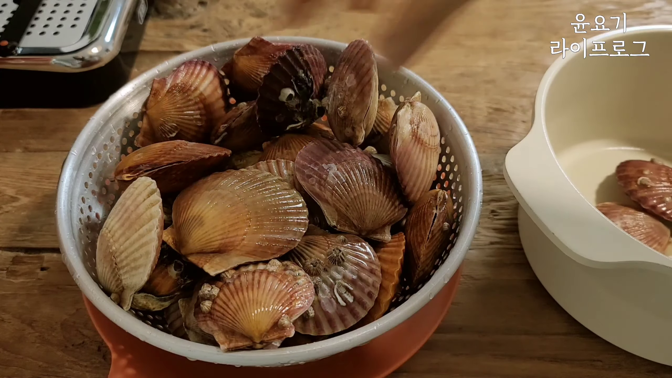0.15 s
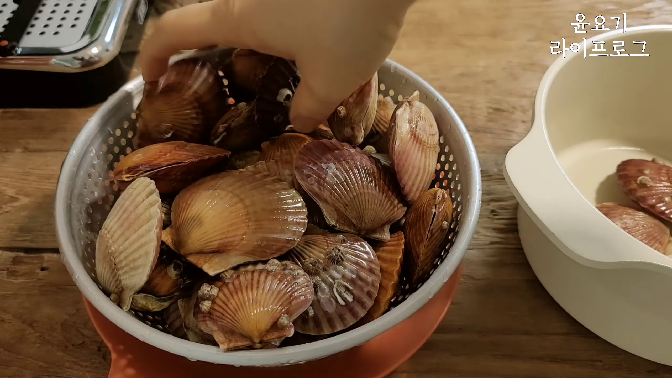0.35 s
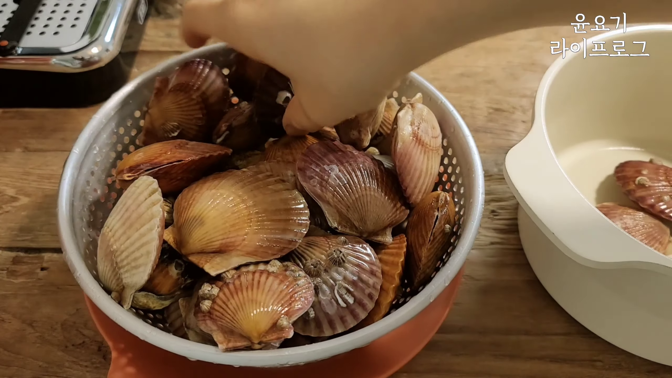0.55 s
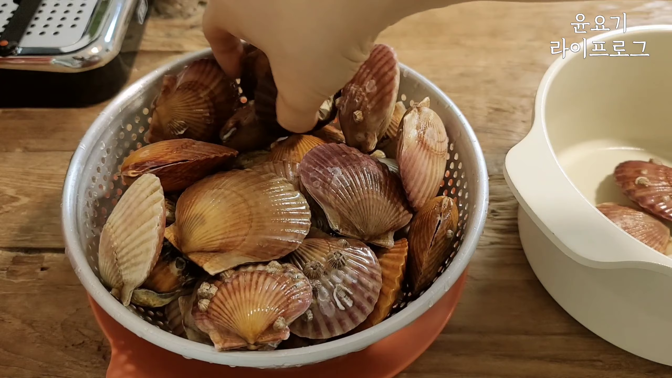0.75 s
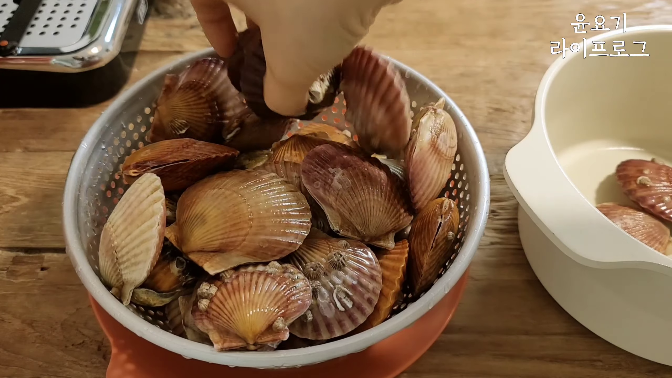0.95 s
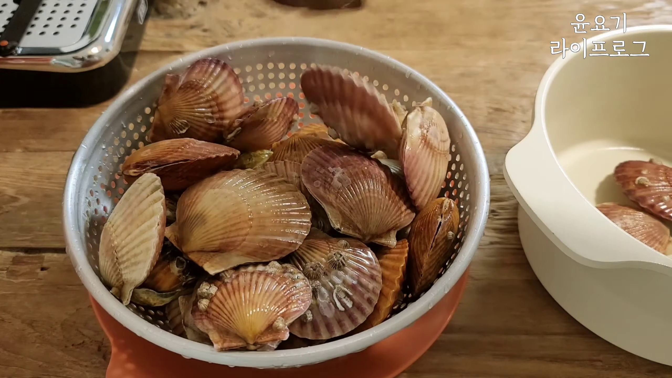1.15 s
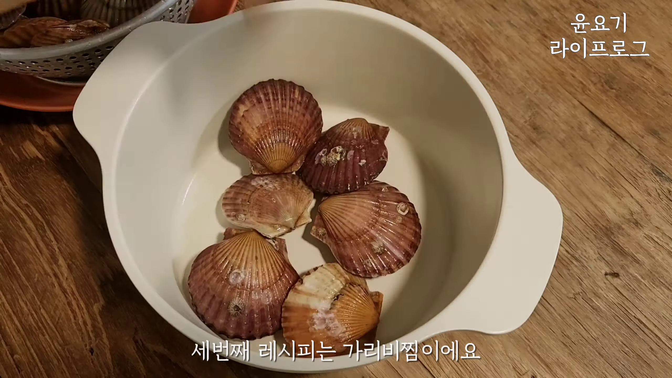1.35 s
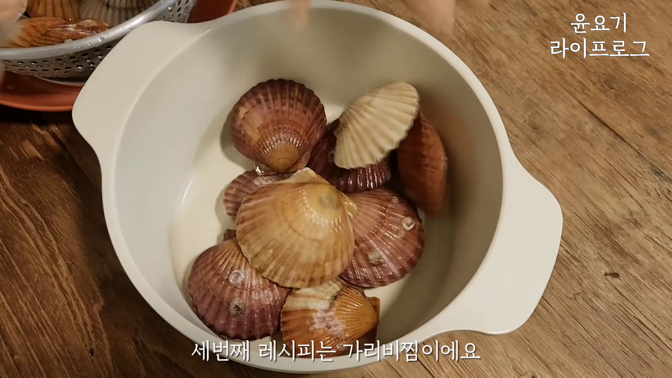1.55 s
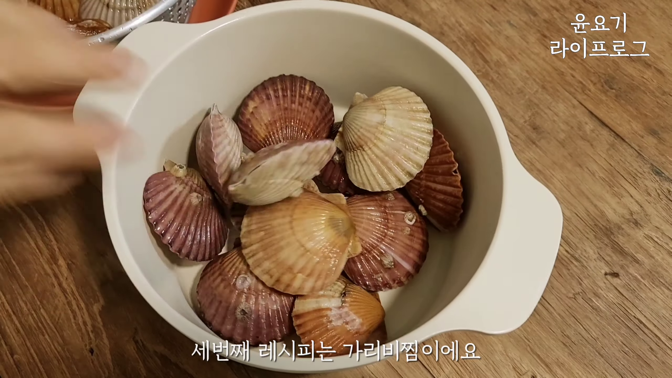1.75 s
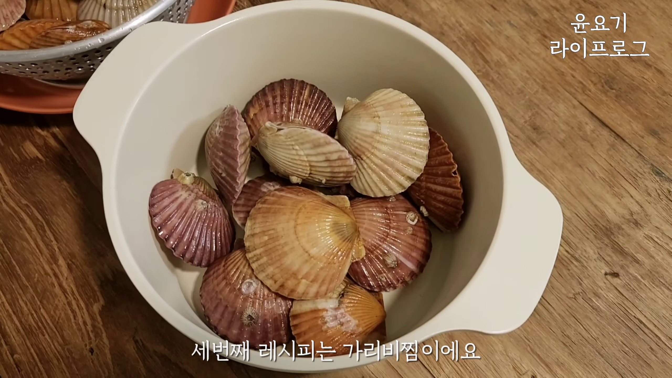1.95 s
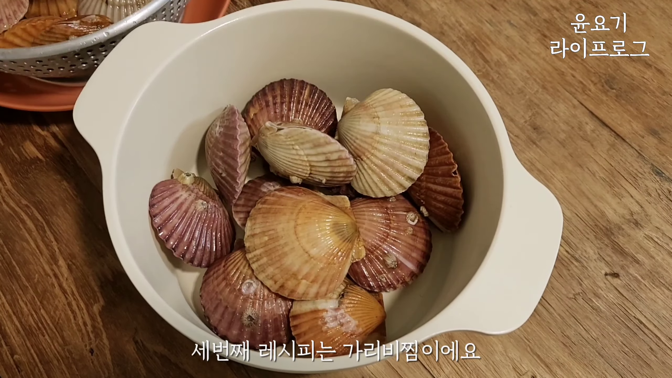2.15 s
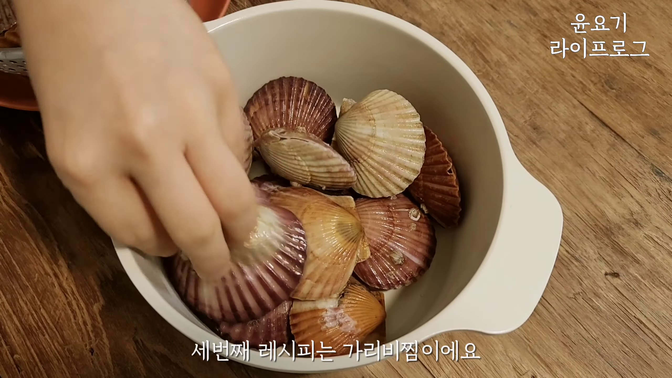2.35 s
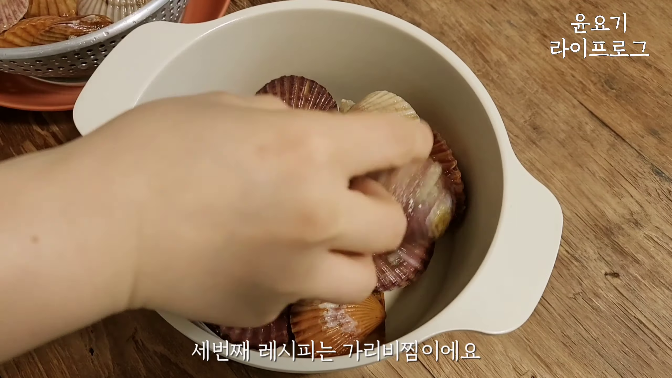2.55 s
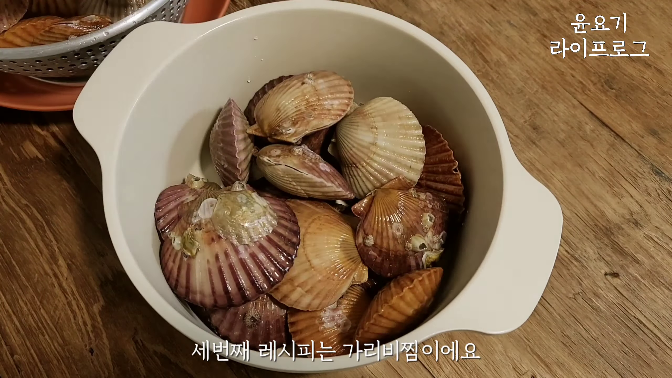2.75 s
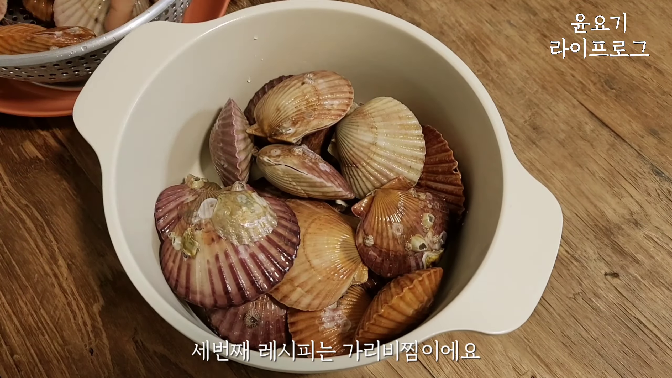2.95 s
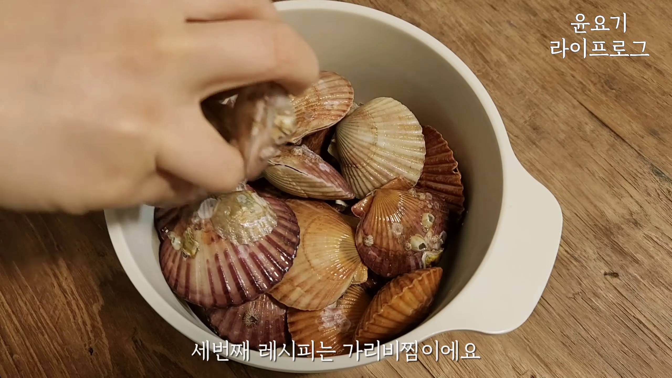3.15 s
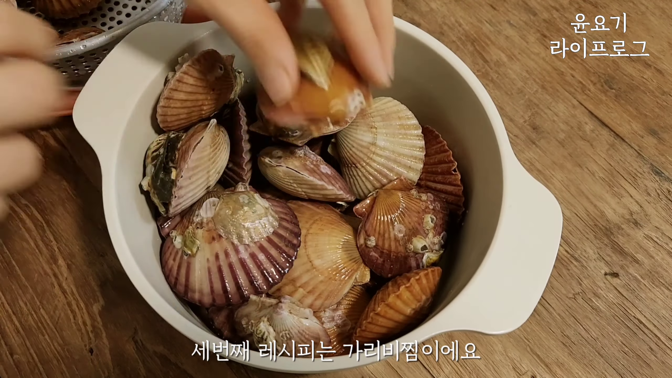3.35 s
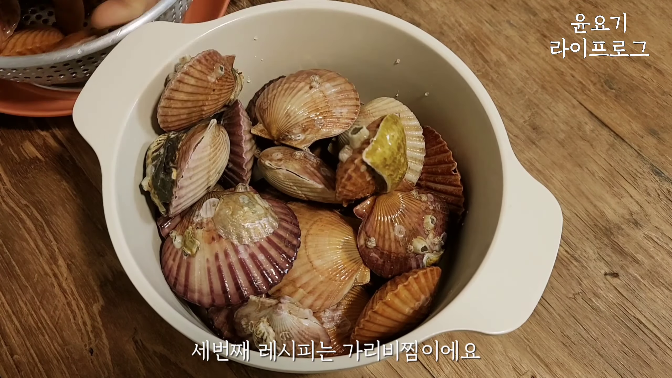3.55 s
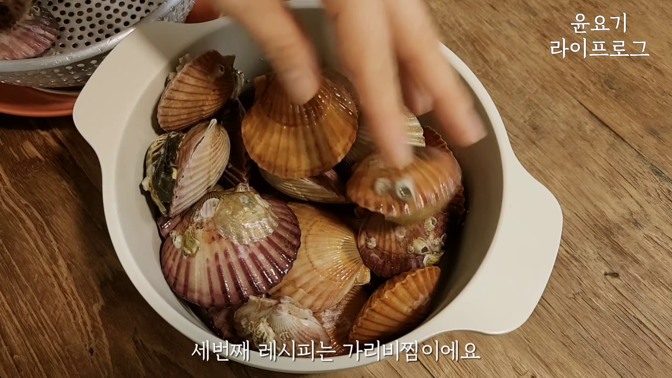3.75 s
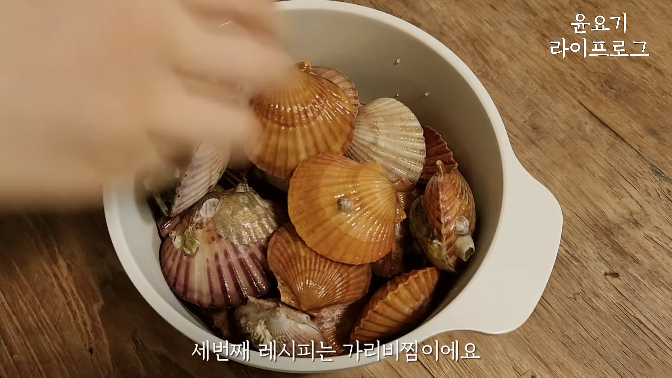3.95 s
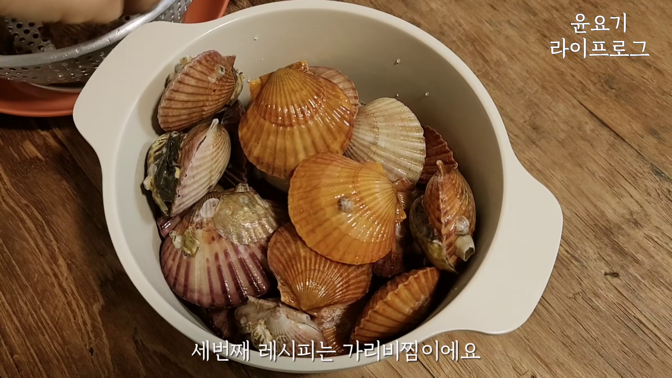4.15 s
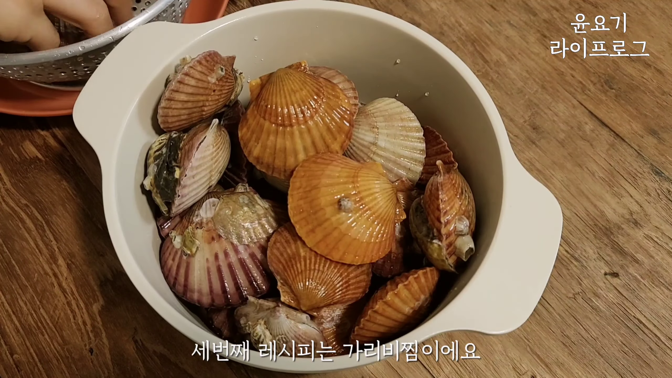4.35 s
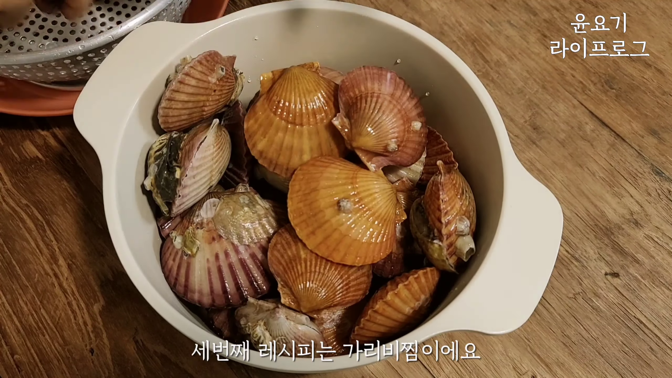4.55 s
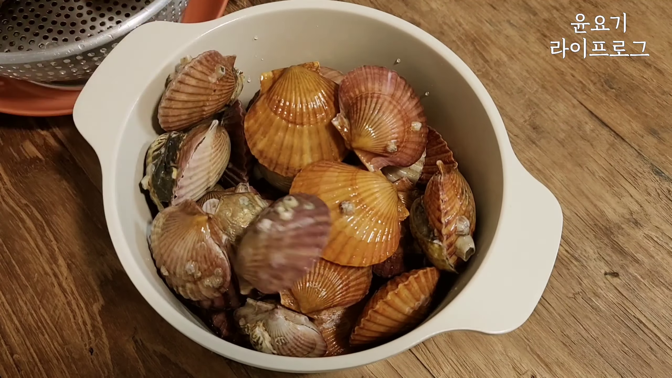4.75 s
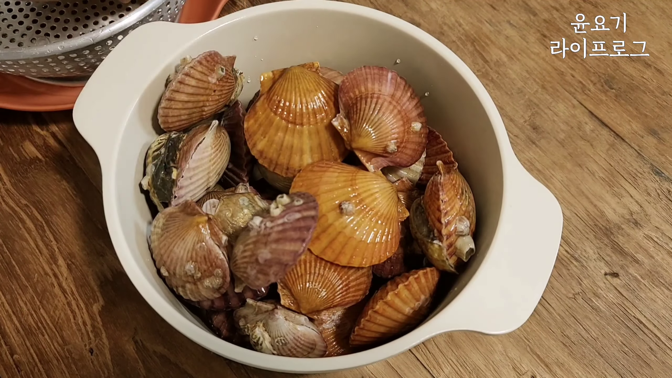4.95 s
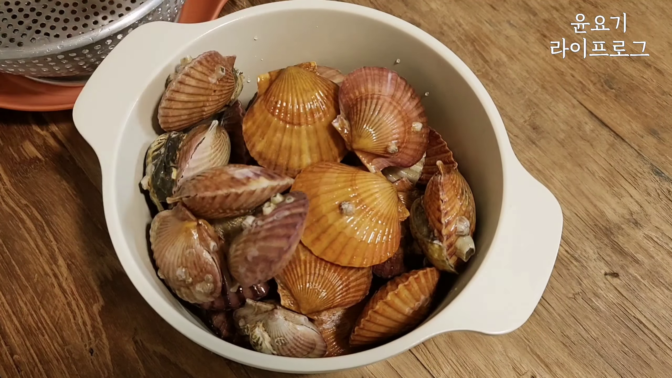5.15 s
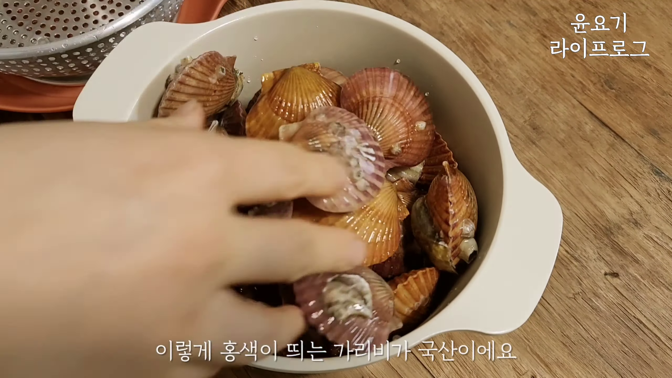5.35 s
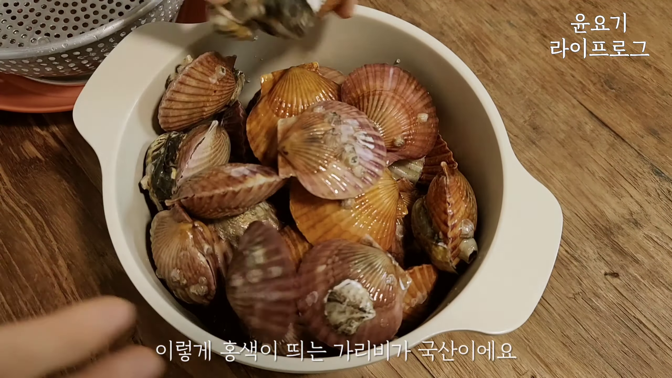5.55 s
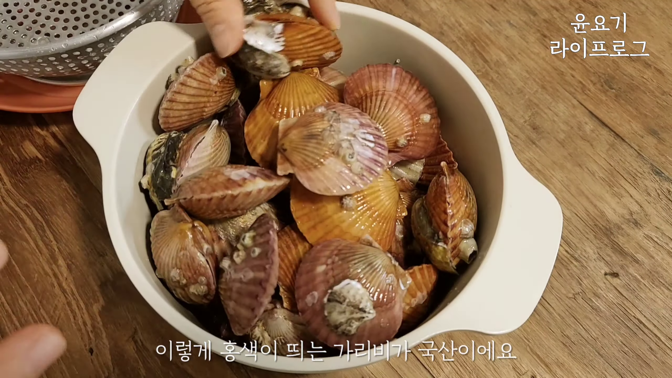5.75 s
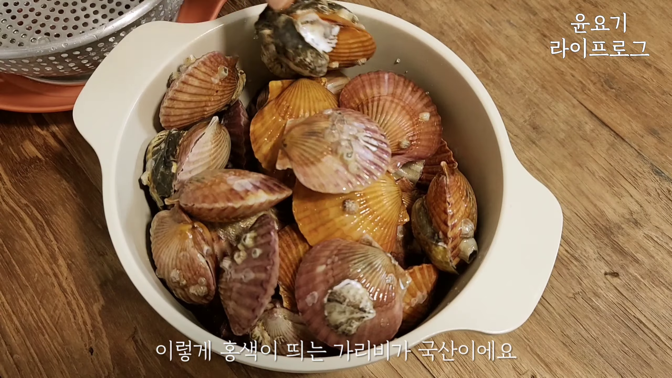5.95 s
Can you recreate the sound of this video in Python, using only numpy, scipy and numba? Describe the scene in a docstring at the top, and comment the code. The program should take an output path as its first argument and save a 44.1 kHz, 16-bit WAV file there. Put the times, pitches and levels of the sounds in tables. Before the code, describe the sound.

Hard ribbed shells grind and knock in a deep heap, then quick sharp clacks and scrapes ring a pot's wall, close up.

```python
"""In a small quiet kitchen a pot rings out, two close microphone ports hearing decaying sines, until a hand damps it.
Meanwhile a hand stirs wet scallop shells in a colander: clacks are bursts of many short modes, ribs grind in dense
small ticks, and low-passed noise rumbles in the table. Soft knocks of damped low modes come through the table top
from 0.35 to about 4 s. Then the shells clack and grind in the pot, shorter and higher in pitch as if sped up, and
its wall rings with them. Faint coloured noise lies under it all."""
import sys
import numpy as np
from scipy import signal
from scipy.fft import rfft, irfft
from scipy.io import wavfile
from scipy.ndimage import uniform_filter1d
from numba import njit

SR = 44100
rng = np.random.default_rng(int(sys.argv[2]) if len(sys.argv) > 2 else 0)


def int16_out(signal):
    """Quantize to a 16-bit WAV file."""
    q = np.round(np.clip(np.atleast_2d(signal).T, -1, 1) * 32767)
    wavfile.write(sys.argv[1], SR, q.astype(np.int16))


N = 268569

# blows of shell on shell, before wall and room: start_s, level_db, strongest_ring_hz
BLOWS = [(0.359, -15, 1260), (0.432, -15.5, 1640), (0.439, -15, 1620), (0.473, -17, 1210),
         (0.609, -18.5, 1700), (0.671, -20, 1660), (0.714, -22, 1450), (0.737, -9, 1540),
         (0.88, -16.5, 1530), (0.898, -17, 1150), (0.935, -16, 1340), (1.041, -15, 1550),
         (1.074, -21.5, 1120), (1.105, -5, 1530), (1.185, -4.5, 1565), (1.235, -7.5, 1500),
         (1.499, -19.5, 4650), (1.516, -7.5, 6180), (1.53, -17, 1340), (1.542, -9.5, 1350),
         (1.589, -5, 5130), (1.605, -16, 5030), (1.623, -14.5, 5370), (1.709, -23, 2620),
         (1.725, -8.5, 5000), (1.739, -7.5, 5200), (1.805, -20.5, 5500), (1.845, -19, 2700),
         (1.874, -14, 4700), (1.896, -17.5, 5060), (2.12, -14.5, 5860), (2.164, -19.5, 2450),
         (2.354, -16, 2530), (2.394, -11.5, 4700), (2.571, -23.5, 5033), (2.595, -9, 2644),
         (2.605, -4.5, 5040), (2.706, -11.5, 2480), (2.716, -6, 4870), (3.214, -15.5, 4604),
         (3.231, -7.5, 4450), (3.333, -10, 5600), (3.338, -18, 3980), (3.413, -10, 4630),
         (3.418, -11, 2593), (3.669, -22.5, 3190), (3.762, -9.5, 4610), (3.829, -16.5, 4760),
         (3.838, -15, 5270), (3.847, -17, 3222), (3.944, -17.5, 4917), (3.953, -11, 6100),
         (3.963, -9.5, 5430), (4.163, -13, 3070), (4.253, -51.5, 2834), (4.285, -23, 3150),
         (4.314, -18, 3209), (4.383, -20.5, 2780), (4.562, -17, 4520), (4.575, -11, 5050),
         (4.692, -9, 5897), (4.695, -8.5, 5700), (4.712, -18, 5060), (5.009, -19, 3013), (5.077, -10, 4580),
         (5.306, -26, 3275), (5.357, -7.5, 4193), (5.366, -9.5, 4616), (5.492, -20, 4900),
         (5.575, -24, 4920), (5.613, -31, 4766), (5.638, -15.5, 5200), (5.699, -9.5, 2340),
         (5.704, -20.5, 2070), (5.808, -17, 6107), (5.902, -27, 3810), (5.949, -18.5, 4930),
         (5.97, -21.5, 2572), (6.021, -25, 4493)]
# ribs dragged over ribs, typical tick level before wall and room: start_s, end_s, level_db
SLIDES = [(0, 0.057, -59), (0.234, 0.247, -45), (0.326, 0.607, -49), (0.662, 0.795, -43),
          (0.861, 0.95, -44), (1.002, 1.303, -53), (1.286, 1.398, -61), (1.498, 1.63, -45.5),
          (1.678, 1.726, -48.5), (1.727, 1.777, -42.5), (1.846, 1.911, -44.5), (1.97, 2.134, -48),
          (2.105, 2.242, -53), (2.351, 2.41, -45), (2.657, 2.77, -49), (2.801, 2.937, -54),
          (2.948, 3.029, -45.5), (3.16, 3.176, -60), (3.214, 3.256, -42), (3.332, 3.363, -46.5),
          (3.523, 3.761, -53), (3.786, 3.893, -51.5), (3.933, 3.985, -42.5), (4.063, 4.429, -47),
          (4.453, 4.539, -53.5), (4.589, 4.687, -60.5), (4.7, 4.736, -42.5), (4.775, 4.96, -53.5),
          (5.005, 5.044, -43.5), (5.077, 5.14, -45.5), (5.224, 5.34, -58.5), (5.381, 5.454, -62.5),
          (5.478, 5.533, -48), (5.631, 5.751, -51), (5.803, 5.862, -52), (5.89, 6.084, -48.5)]
HOLLOW_HZ = 1900  # blows that ring lower come from the deep heap in the colander
TO_POT_S = 1.45  # slides that start from here on are in the pot
RUMBLE_END_S = 1.58  # the colander is stirred until here
GRIP_DB_PER_S, LET_GO_DB_PER_S = 2488, 700  # how fast sliding starts and stops


def undb(db):
    """Level is logarithmic: 20 dB is a factor of ten in amplitude."""
    return 10 ** (np.asarray(db) / 20)


def colour(table, hz):
    """Spectral envelope: dB at the given frequencies, interpolated along log frequency."""
    table_hz, db = np.transpose(table)
    return np.interp(np.log(hz), np.log(table_hz), db)


@njit
def add(out, start, hz, t60, phase, left, right, lag, rise):
    """Modal superposition: exponentially decaying sines with a short rise, each with its own delay at the left."""
    for k in range(len(start)):
        # one complex factor per sample turns the phase and shrinks the amplitude
        step = np.exp((2j * np.pi * hz[k] - np.log(1000) / t60[k]) / SR)
        state = np.exp(1j * phase[k])
        gap = 1.
        first = int(start[k] * SR)
        for i in range(first, min(first + int(.7 * t60[k] * SR), out.shape[1] - 64)):
            gap *= rise
            value = state.imag * (1 - gap)
            out[0, i + lag[k]] += left[k] * value
            out[1, i + 20] += right[k] * value
            state *= step


def modes(start, hz, db, t60, rise_s, leads=0):
    """Free vibration: single decaying tones, equally strong at both ports; leads is the left's, in samples."""
    out = np.zeros((2, N))
    size = undb(db)
    lag = np.full(len(start), 20 - leads)
    add(out, start, hz, t60, 0 * start, size, size, lag, np.exp(-1 / (rise_s * SR)))
    return out


def kitchen():
    """Filtered noise: faint room air, plus low table rumble, mostly common to both ports, while stirring."""
    # spectrum of the room noise, relative: frequency_hz, density_db
    air_colour = [(40, -22.5), (170, 5), (600, -12), (2500, -9), (15000, -24.5)]
    air_db, rumble_db, rumble_hz = -68.5, -63, 135
    f = np.fft.rfftfreq(N, 1 / SR) + 1
    air = irfft(rfft(rng.standard_normal((2, N))) * undb(colour(air_colour, f)), N)

    source = rng.standard_normal(N) + 0.19 * rng.standard_normal((2, N))
    low_pass = 1 / (1 + (f / rumble_hz) ** 2)
    high_pass = 1 / (1 + 60 / f)
    rumble = irfft(rfft(source) * low_pass * high_pass, N)
    stirred = np.clip((RUMBLE_END_S - np.arange(N) / SR) / 0.016, 0, 1)
    return air / air.std() * undb(air_db) + rumble / rumble.std() * undb(rumble_db) * stirred


def knocks():
    """Damped resonance: fingers and vessels thud on the table top, which answers with three low modes."""
    # thuds, level of the strongest mode before its slow rise: start_s, level_db
    thuds = [(0.354, -37), (1.099, -34), (1.178, -25.5), (1.652, -31.5), (1.7, -36), (1.748, -36.5),
             (1.806, -36), (1.865, -31), (1.916, -27.5), (2.083, -37), (2.13, -43), (2.173, -43),
             (2.245, -43), (2.324, -44.5), (2.427, -54), (2.539, -52), (2.791, -41.5), (2.93, -42.5),
             (3.181, -42.5), (3.313, -45), (3.561, -49.5), (3.698, -37.5), (3.92, -42)]
    start, db = np.transpose(thuds)
    centre_hz = np.where(start < RUMBLE_END_S, 103, 179.2)  # under the colander, under the pot
    detune = 1 + .04 * rng.standard_normal((len(start), 3))
    hz = centre_hz[:, None] * [.8, 1, 1.3] * detune
    mode_db = db[:, None] + [-8., 0., -7.]
    return modes(np.repeat(start, 3), hz.ravel(), mode_db.ravel(), np.full(hz.size, .07), rise_s=.009)


def pot_ringing():
    """Free decay, then added damping: the empty pot, struck just before, rings until a hand damps it."""
    # modes of the empty pot, level at the start: frequency_hz, level_db, t60_s
    pot_modes = [(1272, -33, 3.5), (1591, -38, 0.95), (3240, -62, 0.8)]
    damped_s, damping_db_per_s = 0.49, 90
    hz, db, t60 = np.transpose(pot_modes)
    free = modes(0 * hz, hz, db, t60, rise_s=.0001, leads=-8)
    return free * undb(-damping_db_per_s * np.maximum(np.arange(N) / SR - damped_s, 0))


def room(x, wet_db, t60):
    """Diffuse reflection: nearby surfaces return a short decaying noise tail, different at each port."""
    t = np.arange(SR // 2) / SR
    tail = rng.standard_normal((2, len(t))) * undb(-60 * t / t60) * (t > .002)
    tail = tail / np.sqrt(np.sum(tail ** 2, 1, keepdims=True))
    reflected = signal.fftconvolve(x.mean(0, keepdims=True), tail, axes=1)[:, :N]
    return x + undb(wet_db) * reflected


def pot_wall(x):
    """Forced resonance: all that strikes or rubs inside the pot also rings its wall, by convolution."""
    # wall modes, level in the impulse response: frequency_hz, level_db, t60_s
    wall_modes = [(316, -48, .12), (507, -45, .17), (660, -49, .1), (916, -45, .1), (1337, -52, .07),
                  (2137, -57, .2), (5790, -58, .15), (10290, -66, .13)]
    hz, db, t60 = np.transpose(wall_modes)
    response = modes(0 * hz, hz, db, t60, rise_s=.001)[:, :SR // 2]
    return signal.fftconvolve(x, response, axes=1)[:, :N]


def contacts(start, db, ring_hz, shell, leads, count, t60, focus_db, octaves, spread_db, rise_s):
    """Impact excitation: each contact rings a dense random mode set, favouring shell colour and strongest ring."""
    chance = rng.random((len(start), count, 4))
    place = rng.standard_normal((len(start), 2))
    u = (np.arange(count) + chance[..., 0]) / count
    hz = 250 + 16000 * u ** 2

    # high modes die much sooner; those near the strongest ring last longer
    near = np.exp(-(np.log2(hz / ring_hz[:, None]) / octaves) ** 2)
    fade = t60 * (hz / 2000) ** -.7 * (.5 + chance[..., 1])
    fade = fade * (1 + .8 * near)

    # u makes up for the sparser high modes, fade for the energy of longer ringing
    size = undb(colour(shell, hz) + focus_db * near) * np.sqrt(u / fade)
    size = size * undb(db)[:, None] / np.sqrt(np.sum(size ** 2, 1, keepdims=True))

    # each mode radiates its own way, so the ports get unlike shares of it
    pan_db = 1.7 + 3.6 * place[:, :1] + spread_db * (chance[..., 2] - .5)
    left, right = size * undb(pan_db / 2), size * undb(-pan_db / 2)
    mode_shift = .22 * (chance[..., 1] - .5) * SR / hz
    lag = np.clip(20 - leads + 2.5 * place[:, 1:] + mode_shift, 0, 60).astype(np.int64)

    out = np.zeros((2, N))
    rows = (start[:, None] + 0 * hz, hz, fade, 2 * np.pi * chance[..., 3], left, right, lag)
    add(out, *(row.ravel() for row in rows), np.exp(-1 / (rise_s * SR)))
    return out


def grind(slides, blows, shell, leads, slide_hz, settle_s, rate, rattle_db, rattle_t60, t60, focus_db):
    """Stick-slip: sliding ribs catch and let go, and struck shells rattle as they settle, in bunched ticks."""
    slide_start, slide_end, slide_db = np.transpose(slides)
    hit, hit_db, hit_hz = np.transpose(blows)
    last = max(slide_end[-1], hit[-1] + settle_s) + .1

    # random arrivals at `rate` ticks per second, of uneven strength
    chance = rng.random((int(2500 * (last - slide_start[0])), 3))
    start = slide_start[0] + np.cumsum(-np.log(chance[:, 0]) / rate)
    bunch_db = 60 * uniform_filter1d(chance[:, 2] - .5, size=20)
    luck_db = np.minimum(-4.3 * np.log(chance[:, 1]), 16.) + bunch_db
    keep = start < last
    start, luck_db = start[keep], luck_db[keep]

    # every tick against every slide and every blow
    s = start[:, None]
    onset_db = GRIP_DB_PER_S * np.maximum(slide_start - s, 0)
    release_db = LET_GO_DB_PER_S * np.maximum(s - slide_end, 0)
    slide = undb(slide_db - onset_db - release_db)
    since = np.abs(s - hit)
    settling_db = 60 * since / rattle_t60 + LET_GO_DB_PER_S * np.maximum(since - settle_s, 0)
    rattle = undb(hit_db + rattle_db - settling_db) * (s > hit)
    effort_db = 10 * np.log10(np.sum(slide ** 2, 1) + np.sum(rattle ** 2, 1) + 1e-12)

    # a shell just struck keeps the ring of its blow
    latest = np.maximum(np.searchsorted(hit, start) - 1, 0)
    ring_hz = np.where(np.abs(start - hit[latest]) < settle_s, hit_hz[latest], slide_hz)
    heard = effort_db > -78
    return contacts(start[heard], (effort_db + luck_db)[heard], ring_hz[heard], shell, leads, count=14,
                    t60=t60, focus_db=focus_db, octaves=.3, spread_db=13.5, rise_s=0.000093)


def clacks(blows, shell, leads, t60, focus_db, octaves):
    """Impact: each clear blow of shell on shell sets 120 modes ringing at once."""
    start, db, hz = np.transpose(blows)
    return contacts(start, db, hz, shell, leads, count=120, t60=t60, focus_db=focus_db,
                    octaves=octaves, spread_db=13.0, rise_s=0.00014)


def shells_in_colander(blows, slides):
    """Modal radiation of a deep heap: low, hollow clacks and grinding, with a longer reflected tail."""
    # how strongly the shells ring, relative: frequency_hz, density_db
    shell = [(200, -31.5), (550, -5.5), (800, 1.5), (1000, -6), (1560, -4), (2800, -6), (6000, -16),
             (15500, -26)]
    leads = 4  # samples by which the left port leads, on average
    struck = clacks(blows, shell, leads, t60=.017, focus_db=15, octaves=0.24)
    rubbed = grind(slides, blows, shell, leads, slide_hz=1500, settle_s=0.043, rate=1200.,
                   rattle_db=-25, rattle_t60=0.11, t60=0.016, focus_db=7)
    return room(struck + rubbed, wet_db=-7.0, t60=0.3)


def shells_in_pot(blows, slides):
    """Coupled vibration: higher clacks and grinding also drive the pot wall, with a short reflected tail."""
    # how strongly the shells ring, relative: frequency_hz, density_db
    shell = [(150, -46), (250, -19.5), (499, -11), (995, -16), (1310, -10), (1760, -8.5), (4630, -5),
             (10500, -7.5), (15500, -13)]
    leads = 1.5  # samples by which the left port leads, on average
    struck = clacks(blows, shell, leads, t60=.011, focus_db=11.5, octaves=0.13)
    rubbed = grind(slides, blows, shell, leads, slide_hz=3150, settle_s=.04, rate=1300.,
                   rattle_db=-27, rattle_t60=0.10555, t60=0.02, focus_db=9)
    direct = struck + rubbed
    return room(direct + pot_wall(direct), wet_db=-6.0, t60=0.067)


def scene():
    """Linear superposition: room, table, ringing pot and shells add up."""
    blows, slides = np.array(BLOWS), np.array(SLIDES)
    deep = blows[:, 2] < HOLLOW_HZ
    early = slides[:, 0] < TO_POT_S
    shells = shells_in_colander(blows[deep], slides[early]) + shells_in_pot(blows[~deep], slides[~early])
    # the shells carry no bass below about 220 Hz
    shells = signal.sosfilt(signal.butter(2, 220, "high", fs=SR, output="sos"), shells)
    return shells + pot_ringing() + knocks() + kitchen()


def record(dry):
    """Band limiting: a steep elliptic low-pass cuts off the top above 15.8 kHz."""
    return signal.sosfilt(signal.ellip(10, .2, 80, 15800, fs=SR, output="sos"), dry)


dry = scene()
out = record(dry)
int16_out(out)
```